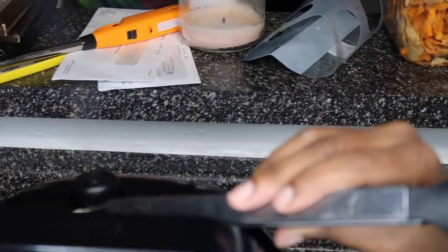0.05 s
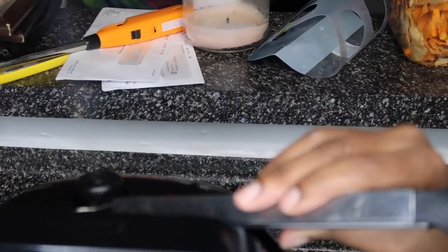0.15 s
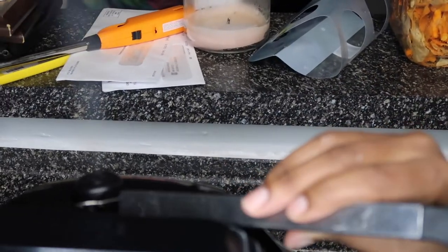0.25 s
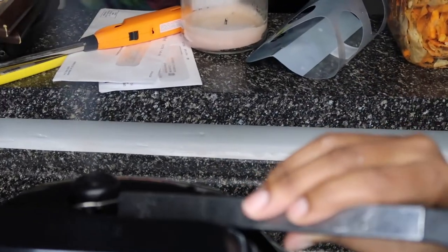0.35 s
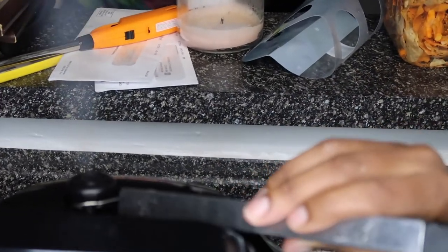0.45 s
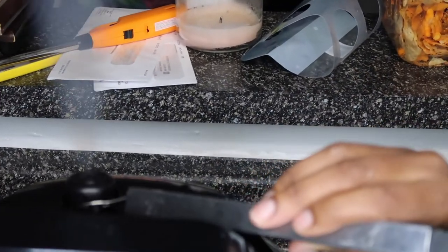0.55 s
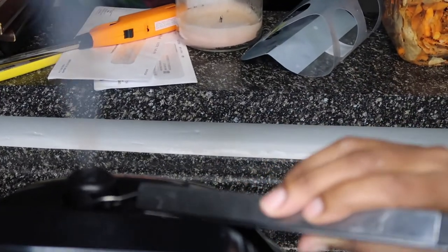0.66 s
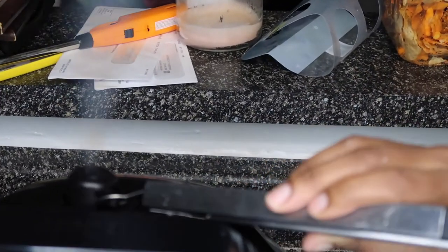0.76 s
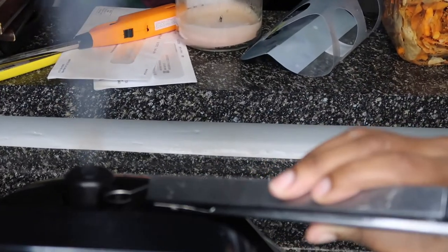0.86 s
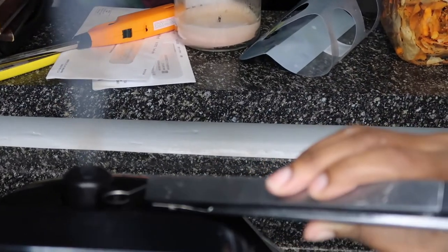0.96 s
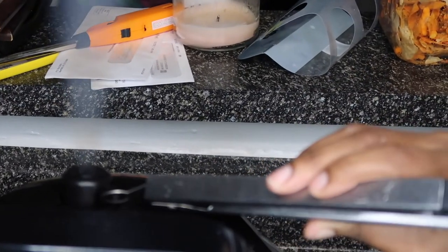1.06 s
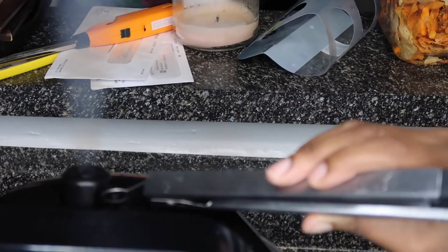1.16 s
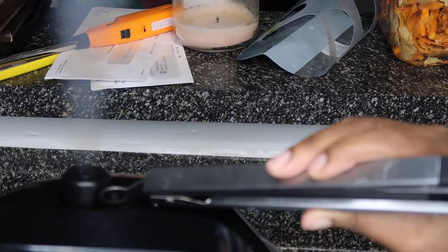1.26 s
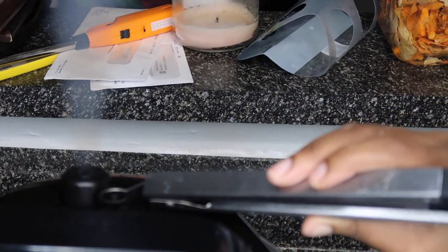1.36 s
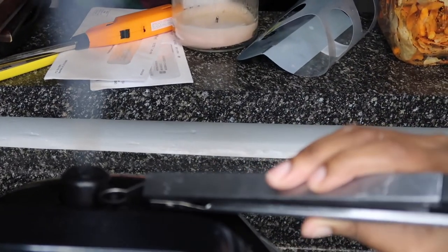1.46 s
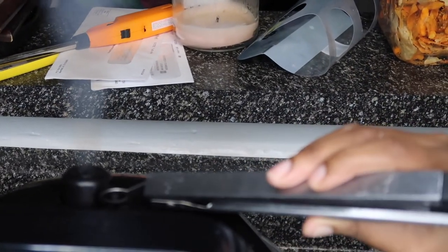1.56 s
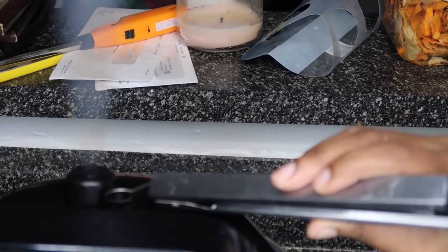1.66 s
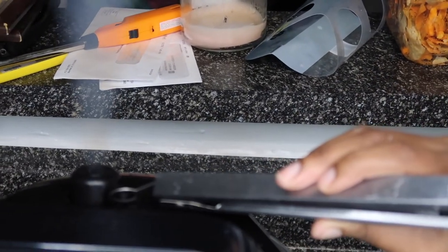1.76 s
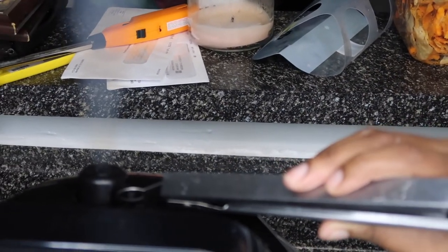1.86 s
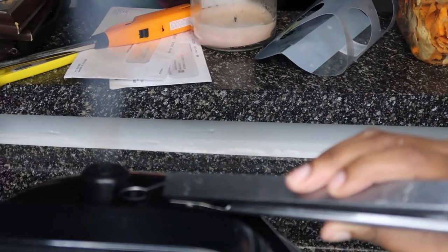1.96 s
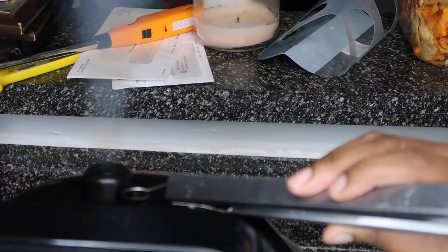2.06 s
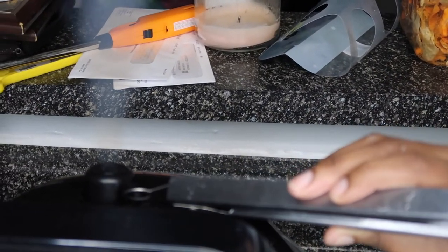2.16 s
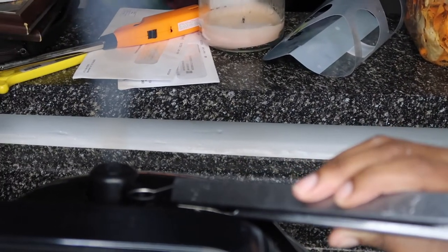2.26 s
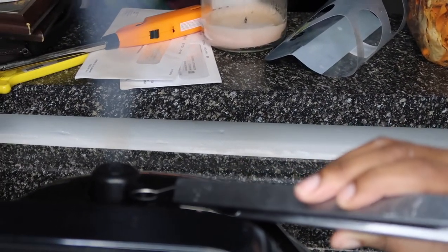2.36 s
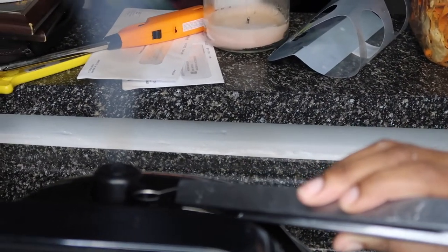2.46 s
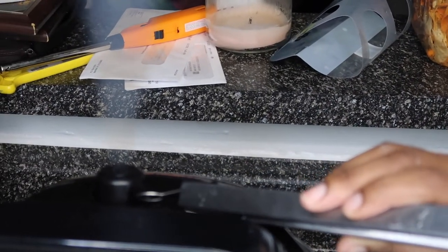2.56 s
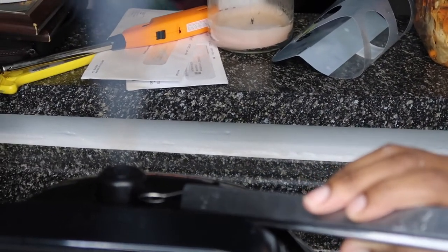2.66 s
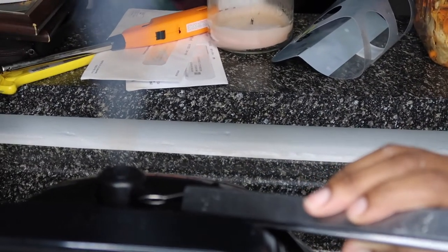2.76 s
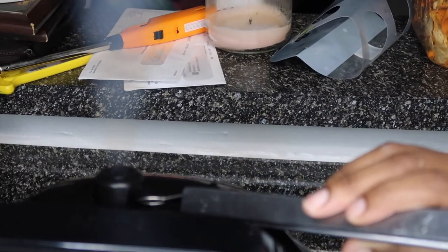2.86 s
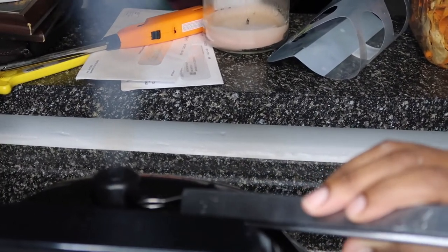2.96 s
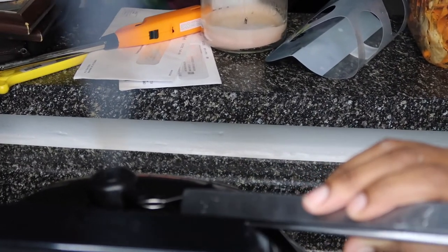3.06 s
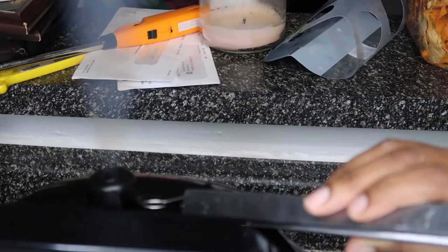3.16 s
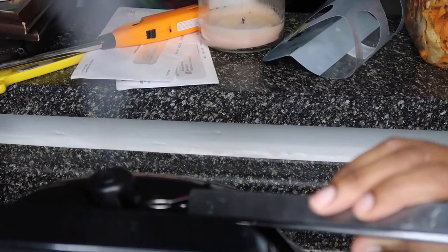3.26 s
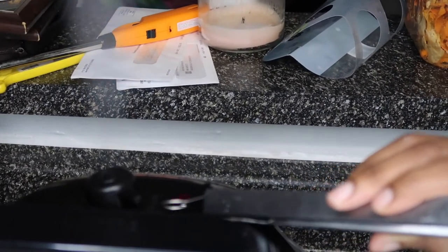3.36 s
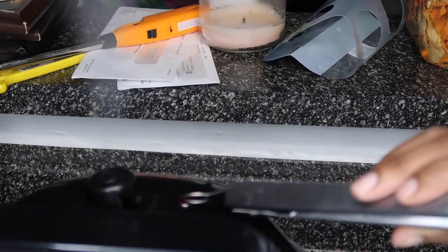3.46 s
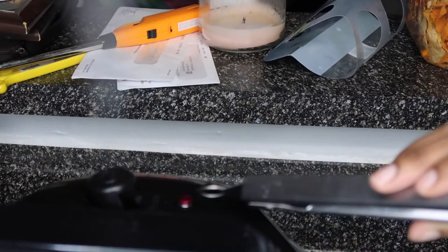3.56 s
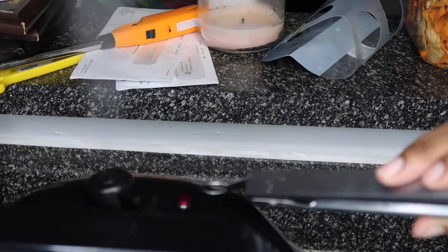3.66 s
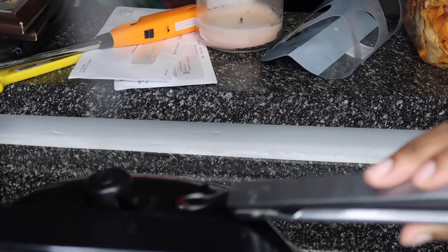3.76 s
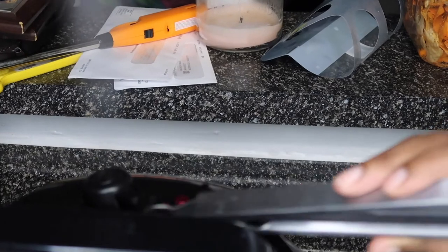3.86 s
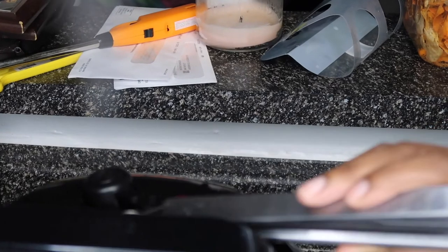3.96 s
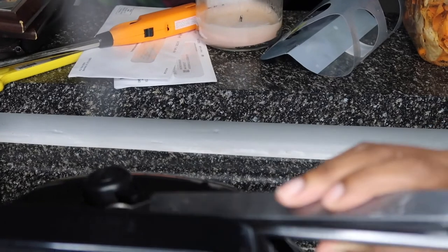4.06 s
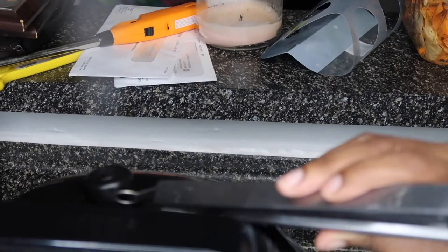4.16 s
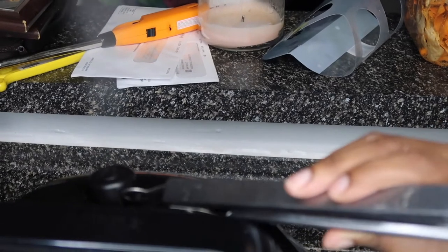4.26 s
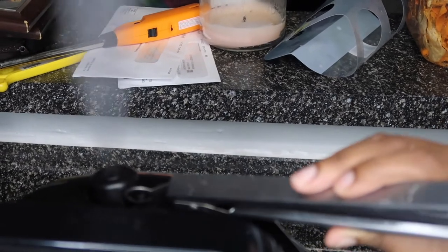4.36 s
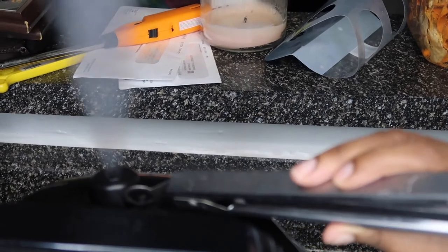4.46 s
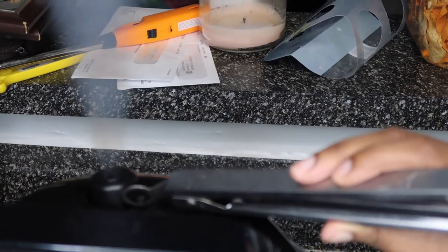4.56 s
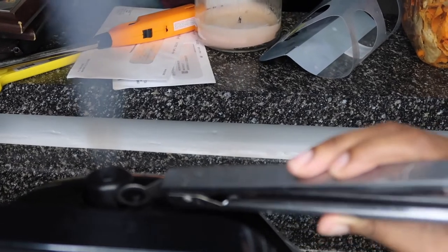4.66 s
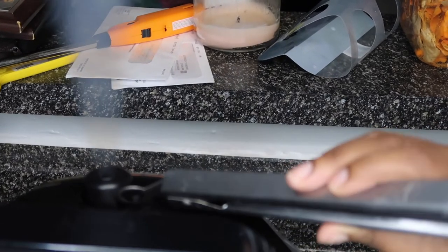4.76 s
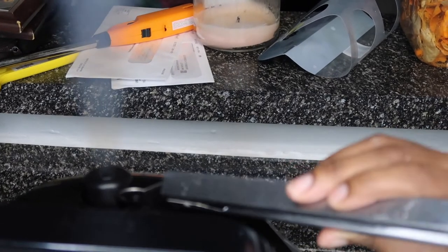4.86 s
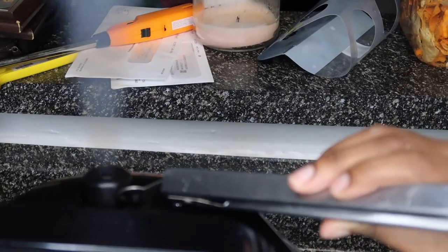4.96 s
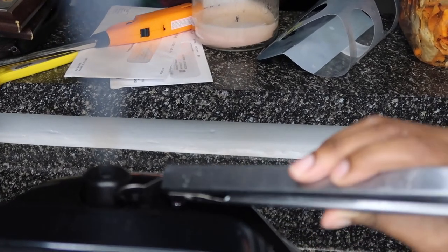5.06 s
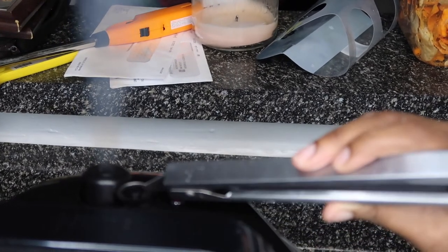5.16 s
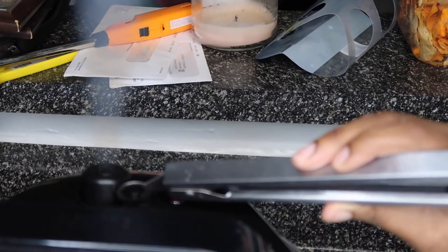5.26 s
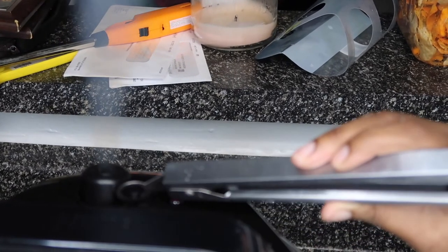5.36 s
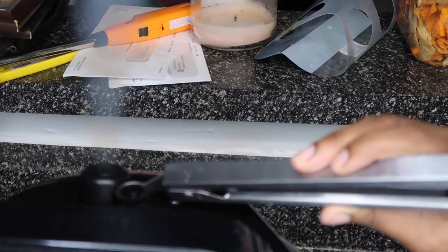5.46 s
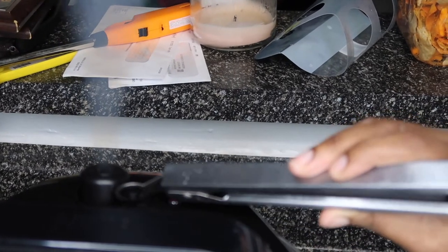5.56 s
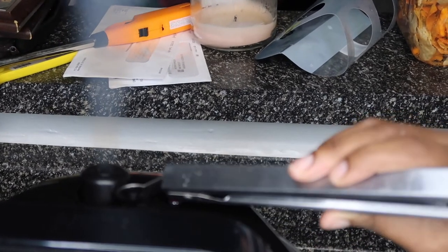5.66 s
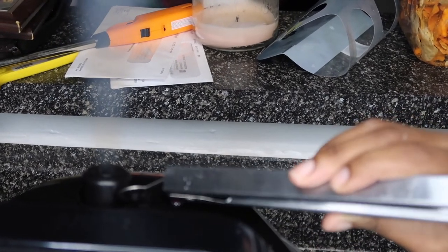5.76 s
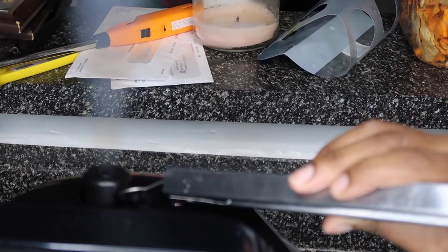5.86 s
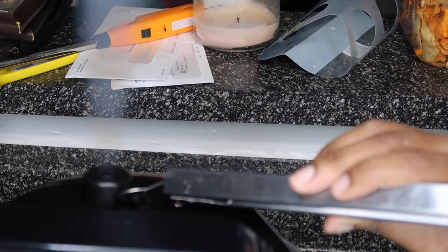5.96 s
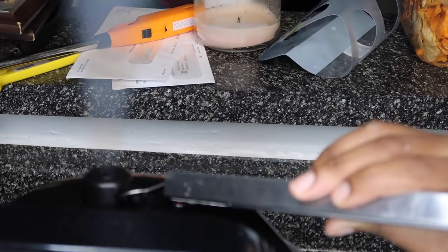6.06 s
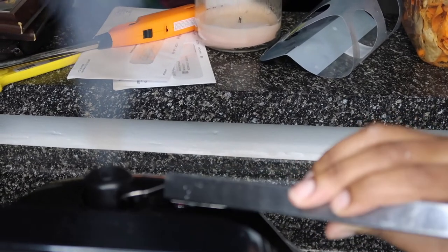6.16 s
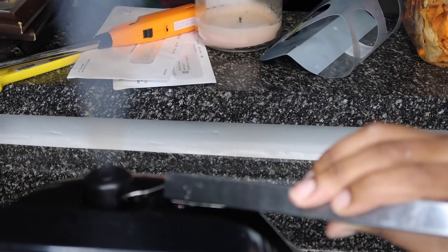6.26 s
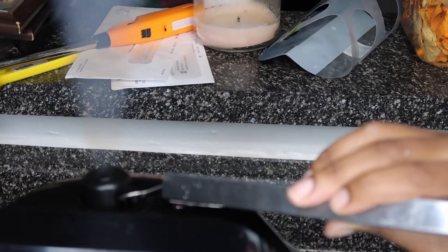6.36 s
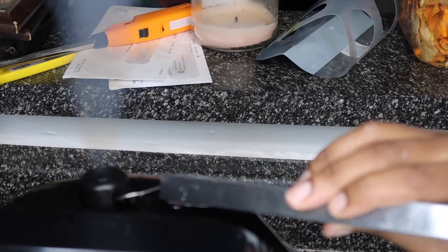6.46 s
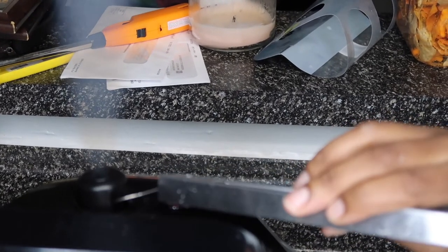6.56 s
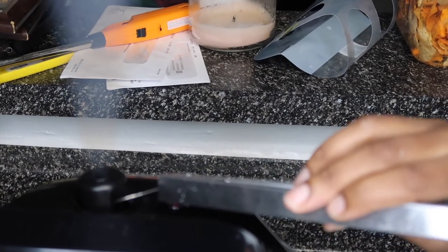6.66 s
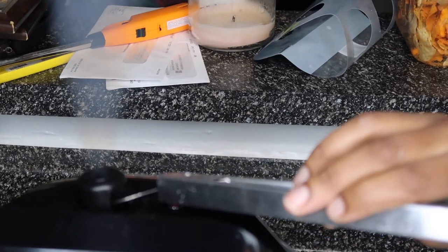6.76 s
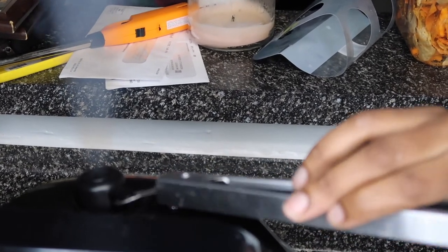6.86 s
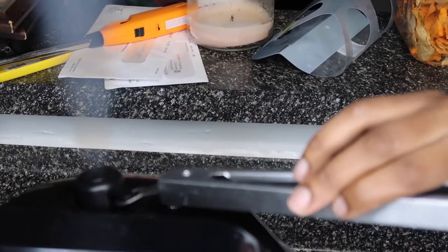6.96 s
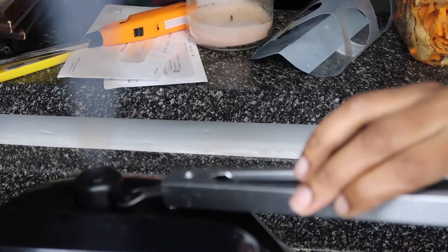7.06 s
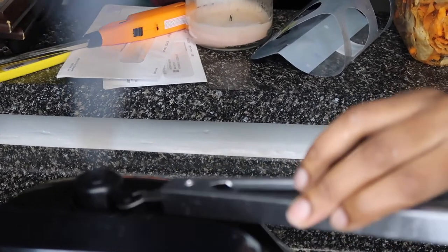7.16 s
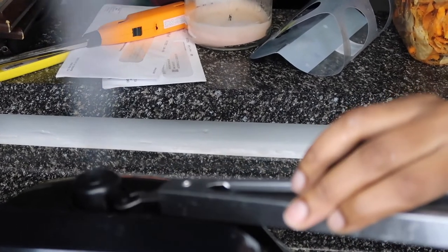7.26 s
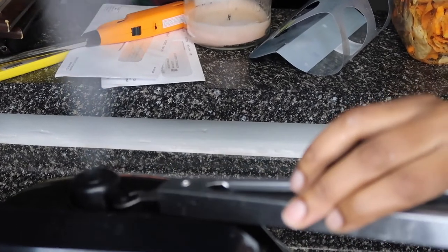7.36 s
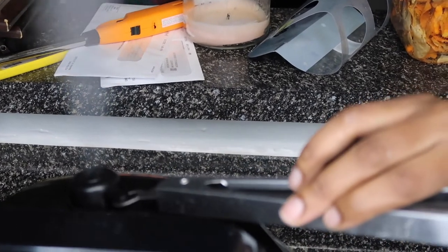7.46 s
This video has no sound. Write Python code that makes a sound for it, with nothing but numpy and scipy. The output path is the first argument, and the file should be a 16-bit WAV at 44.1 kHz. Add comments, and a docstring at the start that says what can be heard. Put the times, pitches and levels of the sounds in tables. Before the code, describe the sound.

From 0 to 0.1 s tongs scrape and clack on a plastic lid over a short low rumble, with only a trace of steam. At about 0.085 s the valve lifts and steam bursts out abruptly. Until about 0.8 s it surges unevenly, swelling around 0.3 s, dipping, then pushing again, its colour bright and fairly high. Light knocks fall at 0.7 and 0.9 s. From there the jet is loud and steady: a hollow roar around 2 kHz under a broad, sharp hiss, slightly fluttering, with faint metallic resonances. Its pitch rises a little towards 3.7 s. Taps come at 4.2 s and a small cluster with a soft scrape at 4.4-4.5 s, as the steam briefly dips and recovers. A very faint tap falls at 5.85 s. The rush continues, edging up in pitch after 7.3 s, and is still blowing at the end, 7.5 s. Faint room air and hum lie underneath; close stereo phone sound.

```python
"""On a kitchen counter, tongs lift the valve of a pressure cooker and a jet of steam escapes, close to a phone.
The jet is turbulent noise: it roars in the hollow of the valve cap and hisses above it, coloured by the pot.
The tongs scrape and knock the plastic lid, whose resonances ring.
Low room air, a faint hum and an opening rumble lie beneath.
The two microphone ports hear the bass alike, while much of the treble reaches them in opposition."""
import sys
import numpy as np
from scipy import signal
from scipy.fft import rfft, irfft, next_fast_len
from scipy.io import wavfile
from scipy.ndimage import uniform_filter1d, map_coordinates

SR = 44100
rng = np.random.default_rng(int(sys.argv[2]) if len(sys.argv) > 2 else 0)


def inscribe(sig):
    """Save sig as 16-bit PCM at rate SR to the path in sys.argv[1].

    A 1-D sig is mono; a 2-D sig holds one channel per row.
    Samples are clipped to [-1, 1] before scaling.
    """
    pcm = np.round(np.clip(np.atleast_2d(sig).T, -1, 1) * 32767)
    wavfile.write(sys.argv[1], SR, pcm.astype(np.int16))


N = 331632  # samples


def amp(db):
    """Decibels are logarithmic: 20 dB is a factor of ten in amplitude."""
    return 10 ** (np.asarray(db) / 20)


def unit(x):
    """Normalisation to a root-mean-square of one."""
    return x / np.sqrt(np.mean(x ** 2) + 1e-20)


def along(points, hz):
    """Interpolation of a spectrum's (Hz, dB) points over logarithmic frequency."""
    f, v = np.transpose(points)
    return np.interp(np.log(hz + 1), np.log(f + 1), v)


def curves(rows):
    """Linear interpolation in time: one value per sample for each column after the time."""
    s, *columns = np.transpose(rows)
    return [np.interp(np.arange(N) / SR, s, column) for column in columns]


def wobble(rate):
    """Slow random fluctuation: a smooth curve through random knots, rate of them a second."""
    knots = rng.standard_normal(int(N * rate / SR) + 4)
    return map_coordinates(knots, [np.arange(N) * rate / SR])


def flutter(rows):
    """Superposed random fluctuations in dB, each with its own speed."""
    return sum(db * wobble(rate) for rate, db in rows)


def filtered(x, response):
    """Linear filtering: the spectrum of x times a complex response of frequency."""
    m = next_fast_len(N + SR // 2)
    return irfft(rfft(x, m) * response(np.fft.rfftfreq(m, 1 / SR)), m)[..., :N]


def smooth_field(shape, size):
    """Random field averaged over size (frequency bins, time frames), with unit spread."""
    field = uniform_filter1d(rng.standard_normal(shape), size[0], 0)
    return unit(uniform_filter1d(field, size[1], 1))


def patchy(patch_db, stripe_db):
    """Turbulence and interference: white noise with brief patches and fine lasting stripes,
    where reflections add and cancel."""
    z = signal.stft(rng.standard_normal(N), nperseg=2048)[2]
    patches = patch_db * smooth_field(z.shape, (32, 3))
    stripes = stripe_db * smooth_field(z.shape, (1, 90))
    return signal.istft(z * amp(patches + stripes), nperseg=2048)[1][:N]


HUM_HZ, HUM_DB = 250.5, -68  # centre pitch, middle level of the sine's peak


def hum():
    """Frequency modulation: a faint mains-like sine whose pitch and level waver a little."""
    cycles = np.cumsum(HUM_HZ + .6 * wobble(4)) / SR
    return amp(HUM_DB + 1.5 * wobble(3)) * np.sin(2 * np.pi * cycles)


# Spectrum of the room air. Each row: frequency in Hz, relative density in dB per Hz.
AIR_SPECTRUM = [(15, -45), (30, -33), (60, -26.5), (120, -22), (215, -16), (273, -15.5), (375, -8.5),
                (475, -9.5), (566, -6), (867, -18.5), (1100, -25), (1430, -27.5), (2420, -120)]
# Level of the low room air, before its small wobble. Each row: time in seconds, level in dB.
AIR_LEVEL = [(0.15, -52.5), (0.31, -54), (0.85, -50), (1.18, -53.5), (2.02, -55), (3.0, -55.5),
             (3.48, -58.5), (4.79, -55.5), (5.96, -56.5), (6.18, -57.5), (6.41, -60.5), (6.78, -54.5),
             (7.4, -54.5), (7.52, -53)]


def kitchen():
    """Shaped broadband noise: low, uneven air sound of the room, the same at both ports."""
    air = filtered(patchy(patch_db=1.6, stripe_db=1.0), lambda hz: amp(along(AIR_SPECTRUM, hz)))
    return amp(curves(AIR_LEVEL)[0] + 0.55 * wobble(9)) * unit(air)


OPEN_S, CRACK_S, LIFT_S = 0.085, 0.064, 0.0079  # valve half lifted; leak established; time of the lift
RUMBLE_DB, RUMBLE_HZ, RUMBLE_S = -51, 242, 0.33  # middle level at its fullest, centre, start of its final drop


def rumble():
    """Band-passed noise: a low rumble, probably handling, swells as the valve lifts, then sinks to a trace."""
    def band(f):
        return (1j * f * RUMBLE_HZ / (RUMBLE_HZ ** 2 - f * f + 1j * f * RUMBLE_HZ)) ** 2
    low = filtered(rng.standard_normal(N), band)
    shape = np.interp(np.arange(N) / SR, [0, OPEN_S, RUMBLE_S, RUMBLE_S + .03], [0.74, 1, 0.56, 0.034])
    return amp(RUMBLE_DB + 1.5 * wobble(14)) * shape * unit(low)


# Resonances of the plastic lid. Each row: frequency in Hz, width in Hz,
# relative level in dB before the contact point favours some of them.
LID_MODES = [(310, 70, 2), (455, 40, 4), (545, 32, 4), (630, 50, 1), (740, 75, 0), (1010, 70, -4),
             (1185, 35, 5), (1500, 60, -3), (1970, 80, -6), (2570, 60, 4), (3210, 120, -3), (3650, 300, -6),
             (4090, 250, -4), (4700, 300, -4), (5500, 500, -4)]


def lid(f, near_hz, reach):
    """Modal superposition: the lid's resonances, strongest within reach (octaves) of the favoured pitch."""
    response = 0
    for k, (c, w, db) in enumerate(LID_MODES):
        favour = 1 / (1 + (np.log2(c / near_hz) / reach) ** 2) ** 2
        mode = 1j * f * w / (c * c - f * f + 1j * f * w)
        response = response + (-1) ** k * amp(db) * favour * mode  # neighbours alternate in sign
    return response


# Tongs slide on the lid. Each row: time of full strength in seconds, length held in seconds,
# level in dB, favoured pitch in Hz, reach in octaves.
SLIDES = [(0.0, 0.012, -39, 453, .3), (0.006, 0.052, -41, 1180, .5), (0.0, 0.026, -48, 2570, .5),
          (0.034, 0.02, -41, 2570, .4), (0.0, 0.03, -67, 4500, .8), (0.04, 0.02, -61, 4700, .8),
          (0.02, 0.04, -45, 600, .6), (0.066, 0.01, -40, 520, .6), (0.09, 0.022, -40, 500, .6),
          (4.445, 0.085, -53, 600, .5)]
BITE_S, FADE_DB_PER_S = 0.019, 600  # rise before full strength, fade after the slide


def scrapes():
    """Friction as noise excitation: each slide drives the lid's resonances."""
    out, t = np.zeros(N), np.arange(N) / SR
    for s, length, db, near_hz, reach in SLIDES:
        onset = np.clip((t - s) / BITE_S + 1, 0, 1)
        slide = onset * amp(db - FADE_DB_PER_S * np.clip(t - s - length, 0, 1))
        rung = filtered(slide * rng.standard_normal(N), lambda f: lid(f, near_hz, reach))
        out += rung * np.linalg.norm(slide) / np.linalg.norm(rung)
    return out


# Tongs touch the lid. Each row: start in seconds, peak level in dB, favoured pitch in Hz, reach in octaves.
TOUCHES = [(0.060, -31, 540, 0.26), (0.060, -25, 1185, 0.56), (0.083, -31, 480, 0.56),
           (0.687, -40, 320, .4), (0.881, -32.5, 500, 0.77), (4.194, -36.5, 545, .12),
           (4.198, -35, 1010, .3), (4.437, -38, 500, .4), (4.438, -33, 1100, .8), (4.450, -46, 630, .3),
           (4.471, -41, 480, .4), (4.497, -45, 580, .4), (4.521, -44, 545, .5), (5.85, -45, 600, .3)]


def knocks():
    """Impulse response: each brief touch sets the lid ringing freely."""
    out = np.zeros(N + SR)
    f = np.fft.rfftfreq(SR // 4, 1 / SR)
    # a blunt, light contact: little treble, little bass
    contact = (1j * f / (250 + 1j * f)) ** 2 / (1 + 1j * f / 1100) ** 2
    for s, db, near_hz, reach in TOUCHES:
        ring = irfft(lid(f, near_hz, reach) * contact)
        out[round(s * SR):][:len(ring)] += amp(db) * ring / abs(ring).max()
    return out[:N]


def tongs():
    """Superposition of friction and impact on the plastic lid."""
    return scrapes() + knocks()


# Narrow resonances of the steel pot under the jet. Each row: frequency in Hz, width in Hz,
# lift or dip in dB before each part of the jet takes its share.
POT_MODES = [(1270, 50, -3), (1413, 65, 3), (1500, 50, -4), (1803, 45, 3.5), (1963, 75, 5.5),
             (2082, 50, 5.5), (2320, 50, 2), (2606, 45, 4.5), (2750, 70, -4), (2868, 60, 3.5),
             (3030, 75, 4), (3960, 100, -3), (4300, 200, -4), (4510, 70, 4), (4930, 75, 4.5), (5174, 40, 4),
             (5468, 50, 10.5), (5770, 40, 5), (6180, 80, 5), (6611, 40, 7), (6746, 30, 3), (7110, 40, 3),
             (7275, 70, 5.5), (7407, 40, 6), (12200, 150, 4)]


def pot_db(hz):
    """Resonance: narrow peaks and dips that the pot gives to the jet."""
    return sum(db / (1 + (2 * (hz - c) / w) ** 2) for c, w, db in POT_MODES)


SHUT_DB, LEAK_DB = -42, -18  # flow level relative to full: valve seated, valve leaking


def opening_db():
    """Flow through an opening valve: seated, leaking, then lifted."""
    times = [CRACK_S - LIFT_S / 2, CRACK_S, OPEN_S - LIFT_S / 2, OPEN_S + LIFT_S / 2]
    return np.interp(np.arange(N) / SR, times, [SHUT_DB, LEAK_DB, LEAK_DB, 0])


FLARE_HZ, FLARE_DB = 3570, 4.5  # a higher roar flares around this pitch
THIN_HZ, THIN_DB = 1690, 5.5  # and thins out around this one


def shift_db(hz):
    """Spectral balance: change of the roar's colour for one step up in pitch."""
    flare = FLARE_DB / (1 + (3 * np.log((hz + 1) / FLARE_HZ)) ** 2)
    thin = THIN_DB / (1 + (14 * np.log((hz + 1) / THIN_HZ)) ** 2)
    return flare - thin


# Spectrum of the roar at its middle pitch. Each row: frequency in Hz, relative density in dB per Hz.
ROAR_SPECTRUM = [(410, -70), (700, -35), (966, -27), (1110, -25.5), (1380, -14.5), (1470, -13), (1580, -6),
                 (1700, -8), (2010, -1), (2250, -7), (2540, -6.5), (2740, -13.5), (4200, -25.5),
                 (5460, -75), (9240, -120)]
CAP_HZ, CAP_SPAN = 2005, 0.11  # middle pitch of the hollow, one step of its pitch as a share
CORE_TOP_HZ = 2450  # the roar's pitch moves below this, its upper shoulder stays
STRIPE_DB = 2.7  # depth of the stripes in roar and hiss


def roar(pitch_hz):
    """Cavity resonance: the hollow of the cap tunes turbulent noise; blended steps glide its pitch."""
    source = patchy(patch_db=0.14, stripe_db=STRIPE_DB)
    high = np.clip((pitch_hz / CAP_HZ - 1) / CAP_SPAN, -1, 2)  # steps above the middle pitch

    def cap(step):
        def response(hz):
            stretch = 1 + step * CAP_SPAN / (1 + (hz / CORE_TOP_HZ) ** 10)
            return amp(along(ROAR_SPECTRUM, hz / stretch) + pot_db(hz) + step * shift_db(hz))
        return filtered(source, response)

    return unit(sum(np.clip(1 - abs(high - step), 0, 1) * cap(step) for step in range(-1, 3)))


TILT_HZ, TILT_DB, TILT_OCT = 6060, 7, 0.31  # pivot of the hiss, strength, distance of the strongest tilt


def tilt_db(hz):
    """Spectral tilt: down below the pivot, up above it, fading further off."""
    u = np.log2((hz + 1) / TILT_HZ) / TILT_OCT
    return TILT_DB * u * np.exp(-u * u / 2)


# Spectrum of the hiss that both ports share. Each row: frequency in Hz, relative density in dB per Hz.
HISS_SPECTRUM = [(300, -80), (1880, -40), (3200, -7.5), (4130, -7), (4820, -6), (5190, -7), (5580, -4),
                 (6220, -6), (7300, -8), (8580, -11), (9360, -8.5), (10700, -17), (11600, -9.5),
                 (12300, -12.5), (15200, -16), (15900, -23)]
RINGS_MORE = .35  # share by which the pot's resonances stand out more as the colour rises


def shared_hiss(spray, colour):
    """Jet noise: turbulent spray, crossfaded between a low and a high colour."""
    def lean(way):
        def response(hz):
            return amp(along(HISS_SPECTRUM, hz) + (1 + way * RINGS_MORE) * pot_db(hz) + way * tilt_db(hz))
        return filtered(spray, response)
    colour = colour.clip(-1, 1)
    return unit((1 - colour) * lean(-1) + (1 + colour) * lean(1))


# Spectrum of what differs across the ports. Each row: frequency in Hz, relative density in dB per Hz.
ACROSS_SPECTRUM = [(2120, -74), (3600, -55), (3760, -4.5), (4050, -16), (4790, 0), (5100, -3.5), (5630, -6),
                   (6110, 4), (7220, -4.5), (8590, 8.5), (9320, -12.5), (10200, 5.5), (12200, 2.5),
                   (15100, -8), (15900, -16)]
SAME_WAVE = .2  # power share of the difference, before shaping, that comes from the shared spray


def across_hiss(spray):
    """Partial coherence: the ports differ by a quarter-cycle copy of the spray and by separate noise."""
    turned = filtered(unit(spray), lambda hz: 1j + 0 * hz)
    separate = unit(patchy(patch_db=-0.9, stripe_db=-6.0))
    apart = np.sqrt(SAME_WAVE) * turned + np.sqrt(1 - SAME_WAVE) * separate
    return unit(filtered(apart, lambda hz: amp(along(ACROSS_SPECTRUM, hz) + .6 * pot_db(hz))))


# The valve worked up in surges, then held open, as two runs of rows. Each row: time in seconds,
# roar level in dB and hiss level in dB before the opening and flutter, pitch of the roar in Hz,
# hiss colour from -1 (low) to 1 (high).
SURGES = [
    [(0.09, -23.5, -30.5, 2230, 1), (0.14, -25, -25.5, 2170, 0.93), (0.212, -23, -27, 2190, 1),
     (0.246, -20, -22.5, 2150, 1), (0.324, -16, -22, 2170, 0.71), (0.338, -19, -27, 2130, .9),
     (0.348, -21.5, -25.5, 2150, .9), (0.424, -23.5, -25.5, 2180, 1), (0.466, -17.5, -23, 2210, .6),
     (0.482, -23.5, -24, 2150, .5), (0.494, -17.5, -23, 2180, 0.51), (0.57, -17, -20.5, 2150, 0.17),
     (0.664, -18.5, -23, 2180, .3), (0.68, -21.5, -25.5, 2120, 0.47), (0.8, -21.5, -20.5, 1970, -0.57)],
    [(0.9, -20.5, -21.5, 2030, -0.27), (0.99, -19, -22, 1990, -0.34), (1.31, -19, -22, 1990, -0.48),
     (1.8, -20, -23, 1990, -0.22), (2.04, -19, -21, 1964, -0.35), (2.3, -18.5, -22, 2010, -0.12),
     (2.4, -20.5, -23, 1990, -.3), (2.87, -20.5, -24, 1990, -0.19), (3.17, -18.5, -22.5, 2036, 0.11),
     (3.7, -19, -23, 2104, 0.44), (4.22, -18.5, -24, 2040, 0.34), (4.35, -23, -26.5, 2020, 0.31),
     (4.43, -19.5, -26.5, 2000, .2), (4.49, -18, -25, 2060, 0.15), (4.59, -20.5, -25.5, 2060, .1),
     (4.65, -18, -24, 2050, 0.2), (4.85, -18.5, -24.5, 2054, 0.052), (5.15, -19, -22, 1980, -0.2),
     (5.51, -20.5, -22.5, 1960, -0.37), (5.87, -20, -21.5, 1960, -0.17), (6.26, -19, -23, 2000, -0.46),
     (6.78, -19.5, -23, 2010, -0.42), (7.22, -20, -24, 2010, -0.26), (7.35, -20.5, -24, 2090, -0.033),
     (7.52, -19, -25, 2160, 0.089)],
]
# Unsteady flow of the whole jet. Each row: knots a second, depth in dB.
FLOW_FLUTTER = [(6, 0.52), (18, -0.01), (60, 0.64)]
# The roar's own added flutter. Each row: knots a second, depth in dB.
CAP_FLUTTER = [(10, 0.36), (40, 0.5)]


def jet():
    """Amplitude modulation by flow: steam through the valve, as (both ports, across the ports)."""
    roar_db, hiss_db, pitch_hz, colour = curves(np.concatenate(SURGES))
    flow_db = opening_db() + flutter(FLOW_FLUTTER)
    roar_level = amp(roar_db + flow_db + flutter(CAP_FLUTTER))
    hiss_level = amp(hiss_db + flow_db)
    spray = patchy(patch_db=1.12, stripe_db=STRIPE_DB)
    both = roar_level * roar(pitch_hz) + hiss_level * shared_hiss(spray, colour)
    return both, amp(1.5) * hiss_level * across_hiss(spray)


def scene():
    """Superposition: shared sound at both ports, the difference added at one and subtracted at the other."""
    steam, across = jet()
    both = hum() + kitchen() + rumble() + tongs() + steam
    return np.array([both + across, both - across])


LOW_CUT_HZ, TOP_HZ = 24, 15800  # corner of the bass roll-off, band limit


def record(dry):
    """Band limitation: the phone rolls off the deep bass and keeps nothing above its limit."""
    return filtered(dry, lambda hz: (1j * hz / (LOW_CUT_HZ + 1j * hz)) ** 2 * (hz < TOP_HZ))


dry = scene()
out = record(dry)
inscribe(out)
```